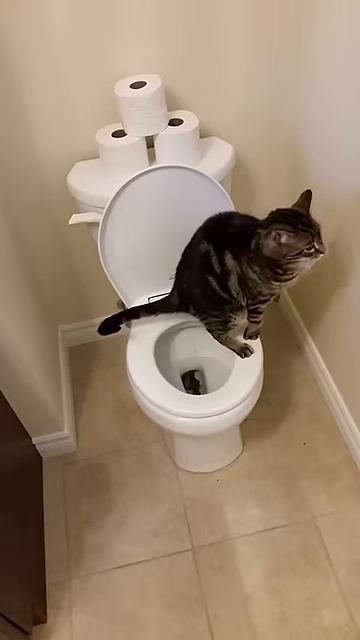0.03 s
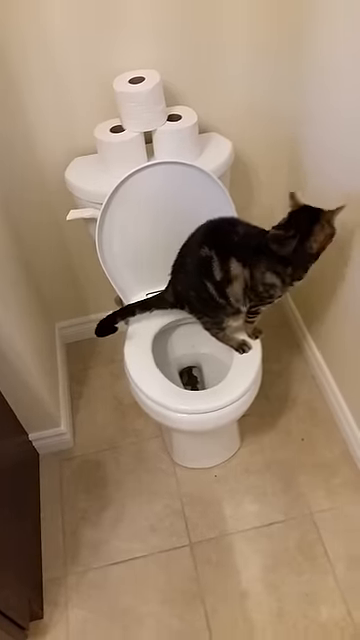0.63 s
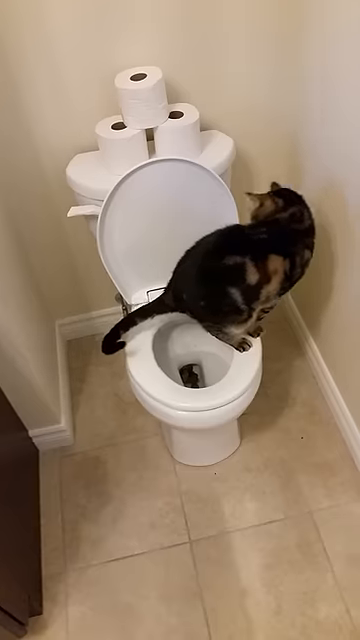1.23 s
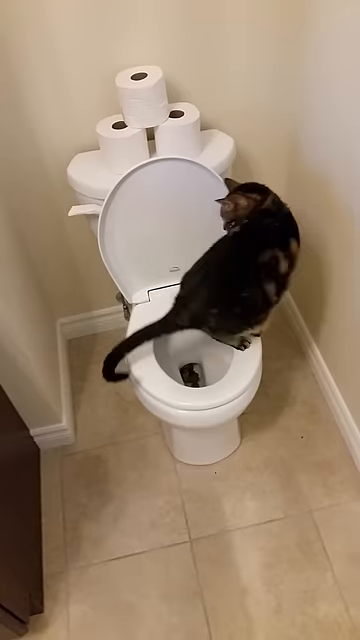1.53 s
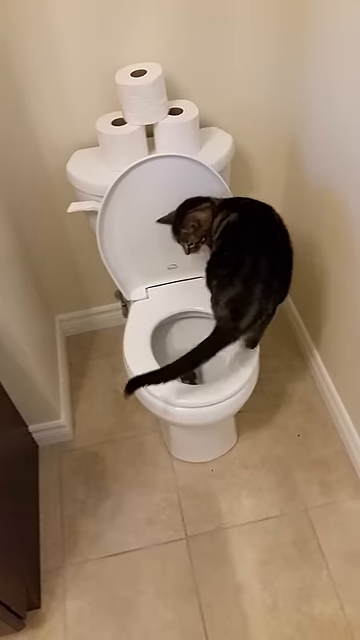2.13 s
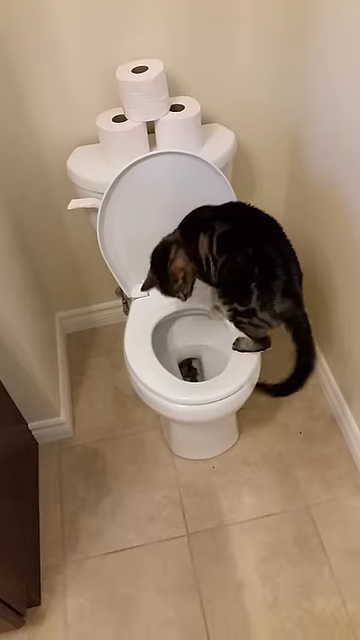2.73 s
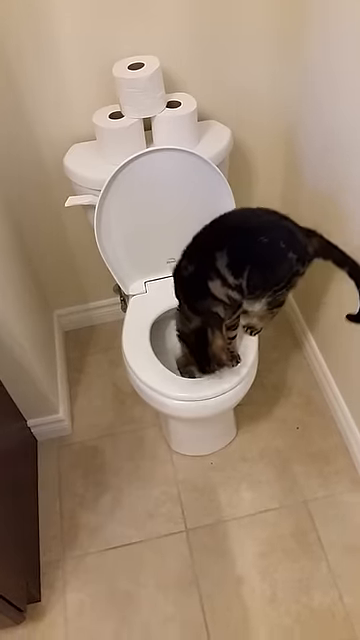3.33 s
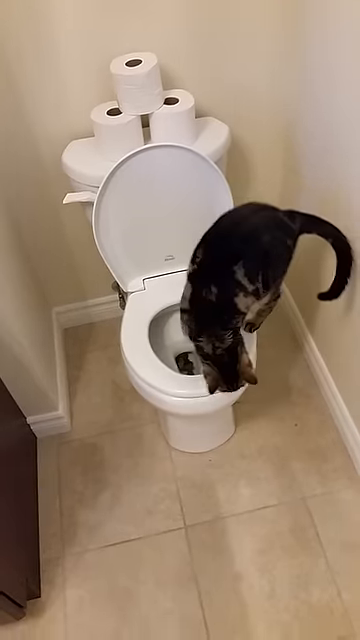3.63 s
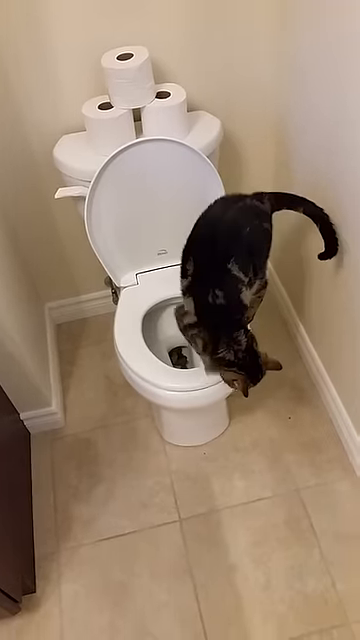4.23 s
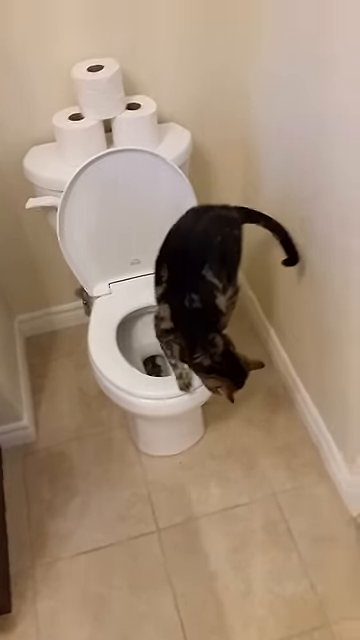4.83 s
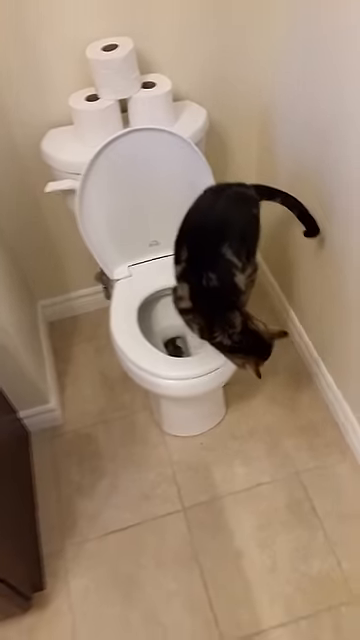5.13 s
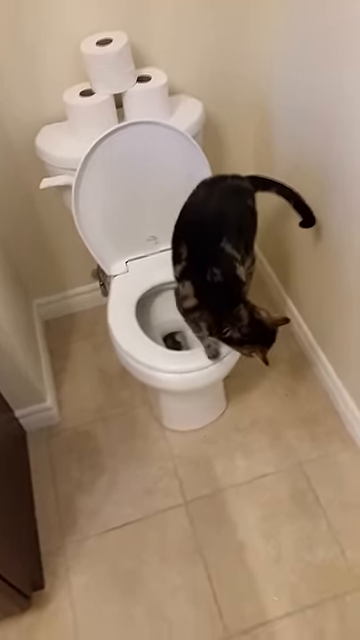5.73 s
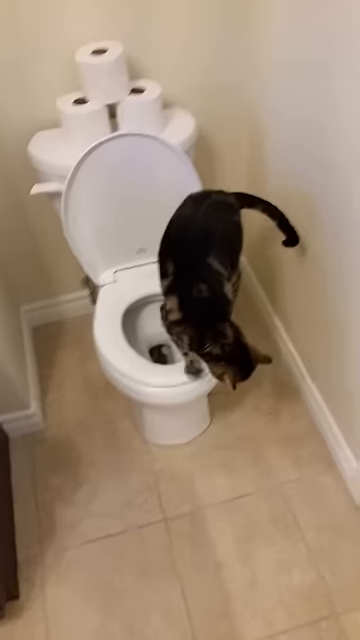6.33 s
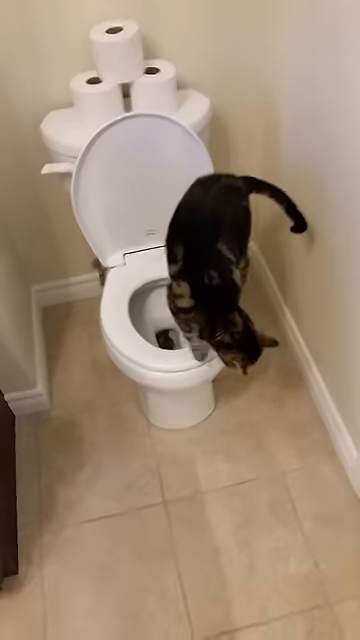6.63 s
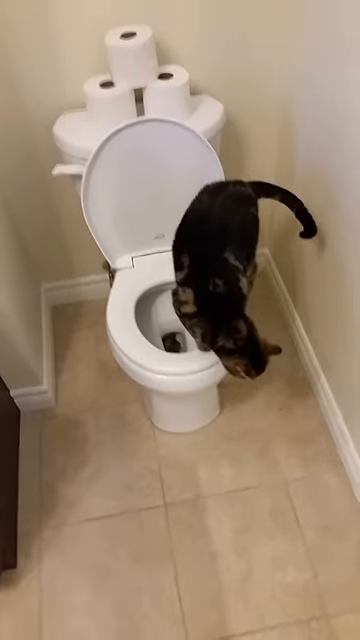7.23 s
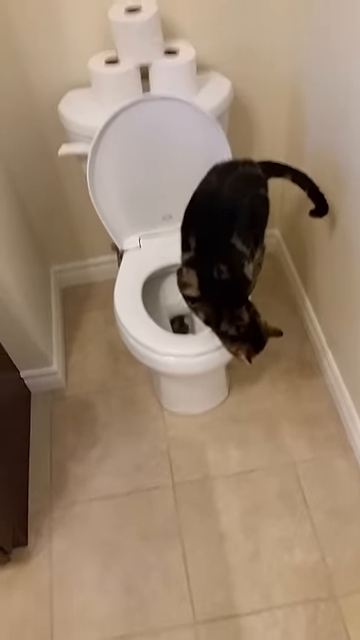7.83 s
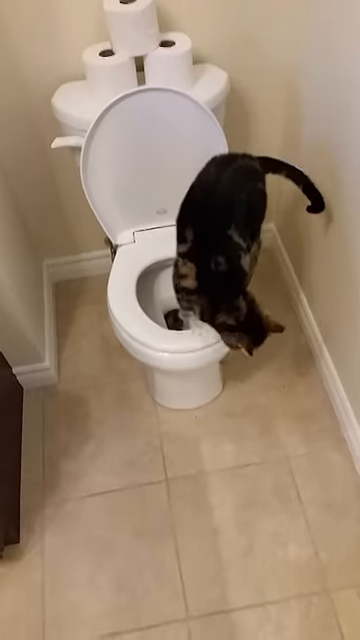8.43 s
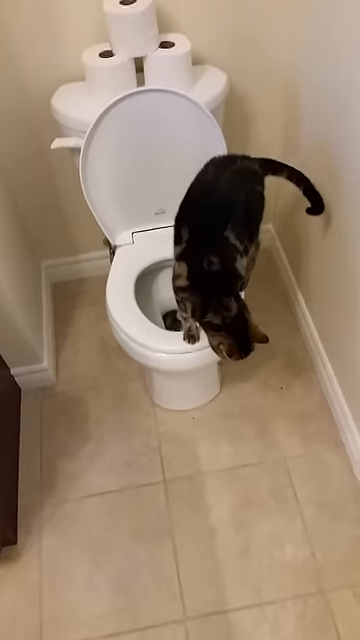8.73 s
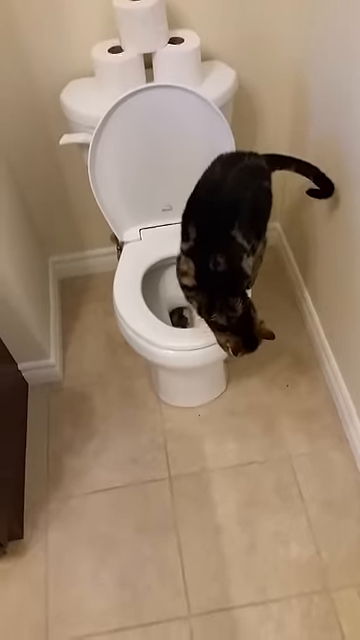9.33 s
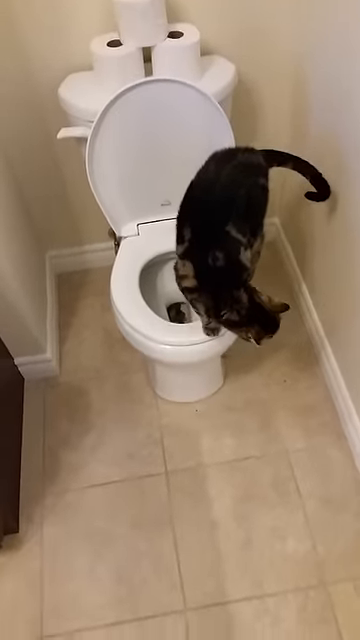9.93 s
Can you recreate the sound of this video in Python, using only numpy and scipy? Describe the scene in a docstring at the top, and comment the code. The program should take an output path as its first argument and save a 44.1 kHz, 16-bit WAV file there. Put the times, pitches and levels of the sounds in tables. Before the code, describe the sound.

Thin, high paw swipes on a toilet seat over low room hum, with handling rumble, knocks and one close scrape on the microphone.

```python
"""Small tiled bathroom. A cat paws at a plastic toilet seat: a few thin, very high friction swipes,
prolonged by the tiles. Midway the hand holding the phone shifts its grip: fingers rub and bump the
case, and one slides over the right microphone port and snaps off. Low room hum underneath."""
import sys
import numpy as np
from scipy import signal
from scipy.fft import rfft, irfft
from scipy.io import wavfile

SR = 44100
rng = np.random.default_rng(int(sys.argv[2]) if len(sys.argv) > 2 else 0)


def unload_audio(sound):
    """Save the sound as a 16-bit wav file, at the path given as the first command line argument."""
    columns = np.transpose(np.atleast_2d(sound))
    # keep every value between -1 and 1, then stretch to whole-number steps
    steps = np.round(np.clip(columns, -1, 1) * 32767)
    wavfile.write(sys.argv[1], SR, steps.astype(np.int16))


N = 441000
TIME = np.arange(N) / SR
LIGHT_DB, FIRM_DB = -66, -49.5  # hand effort in a light and a firm grip
# hand effort, as case rumble: (time [s], level [dB])
HAND_EFFORT = [(0, -72.5), (3.3, -70), (4.55, -71), (4.78, -61), (5.02, -47.5), (5.35, -54.5), (5.78, -51),
               (6.0, -49.5), (6.65, -43.5), (6.98, -50.5), (7.22, -60), (7.8, -55), (8.1, -58.5),
               (8.9, -64), (9.45, -67.5), (10, -65.5)]
# case rumble spectrum: (frequency [Hz], gain [dB])
RUMBLE_SPECTRUM = [(20, -6.5), (35, 0.5), (60, 4.5), (120, -4.5), (200, -6.5), (300, -16.5), (500, -33.5),
                   (1000, -68)]


def paw():
    """Pad and claws skim the seat with a thin hiss and stir its dull body; a caught claw rings."""
    # swipes, the faint long ones light drags: (time [s], level [dB], rise [s], fall [s], L-R [dB])
    swipes = [(5.04, -74, .13, .28, 1), (5.6, -86, .2, .3, 2), (5.92, -69.5, 0.06, 0.23, -4),
              (6.7, -74, .4, .35, 1), (7.39, -77, 0.026, 0.044, -5), (7.54, -67, 0.041, .039, -10),
              (7.615, -58.5, 0.063, 0.031, -9), (7.768, -36.5, 0.01, .0021, -15),
              (7.773, -45, 0.015, .02, 4), (8.24, -49.5, .025, 0.044, -2.5),
              (9.451, -85.5, 0.077, 0.029, 1.5), (9.62, -49.5, 0.0082, 0.0079, -2.5),
              (9.644, -47.5, .028, .028, -1)]
    # claw catch, then skid: (time [s], level [dB], rise [s], fall [s], L-R [dB])
    claw_strokes = [(2.238, -58, 0.0016, .004, -5), (2.26, -65.5, .012, 0.044, -7)]
    # spectra of swipe hiss, claw ring, seat body: (frequency [Hz], gain [dB])
    swipe_spectrum = [(1500, -55), (2700, -43), (5000, -40), (8000, -35), (9300, -26), (10100, -7),
                      (12000, -6), (14000, -2.5), (15500, 1), (17000, -20)]
    claw_spectrum = [(8000, -45), (10000, -22), (11200, -5), (12000, 3), (13200, -9), (15500, -12),
                     (17000, -30)]
    seat_spectrum = [(25, -8), (60, -1), (160, -1), (350, -12), (900, -18), (1600, -29), (2600, -28),
                     (4500, -50)]
    seat_decay_s = .05
    grain = slips(rate_hz=18000, spread_db=3.5, shared=.18)
    envelope = strokes(swipes)
    skim = envelope * colour(grain, swipe_spectrum)
    claw = strokes(claw_strokes) * colour(grain, claw_spectrum)
    pole = np.exp(-1 / (seat_decay_s * SR))
    body_envelope = signal.lfilter([1 - pole], [1, -pole], envelope)
    body = body_envelope * colour(slips(rate_hz=4000, spread_db=2.5, shared=.34), seat_spectrum)
    return (skim + claw) * undb(1.1 * wander(90)) + undb(-9) * body


def port_slide():
    """A finger lands on the right port, skids, sticks, speeds up evenly and lifts; faster is louder."""
    # spectra of scrape, scrape through the case, port hiss: (frequency [Hz], gain [dB])
    near_spectrum = [(150, 1), (400, 4), (700, -4), (1100, -9), (2500, -16.5), (4200, -23.5), (6000, -26),
                     (8300, -37), (11000, -42)]
    far_spectrum = [(200, -6), (500, -2.5), (850, -1), (1300, -6), (2000, -20), (3000, -35), (4500, -42),
                    (9000, -56)]
    hiss_spectrum = [(7000, -36), (9000, -20), (10500, -6.5), (12300, 0), (14000, -1.5), (15600, -2.5),
                     (17000, -17.5)]
    land_s, stick_s, restart_s, lift_s = 6.776, 6.81, 6.826, 6.956
    attack_s, release_s = .003, .004
    skid_speed, creep_speed = .08, .02  # lift-off = 1
    touch = np.exp(np.minimum(TIME - land_s, 0) / attack_s - np.maximum(TIME - lift_s, 0) / release_s)
    ramp = np.clip((TIME - restart_s) / (lift_s - restart_s), creep_speed, 1)
    speed = np.where(TIME < stick_s, skid_speed, ramp)
    grain = slips(rate_hz=15000, spread_db=2.5, shared=.067)
    near = colour(grain[1], near_spectrum)
    far = undb(-8.5) * colour(grain[0], far_spectrum)
    scrape = undb(-26 - 22 * (1 - speed) + 2.2 * wander(300)) * np.array([far, near])
    hiss = undb([[-60], [-40]]) * speed ** .8 * colour(grain, hiss_spectrum)
    judder = slips(rate_hz=620, spread_db=3.5, shared=.1)
    rumble = undb([[-51], [-33]]) * colour(judder, RUMBLE_SPECTRUM)
    return touch * (scrape + hiss + rumble)


def case_knocks():
    """Soft finger bumps and dry clicks of nail or case; skin rounds a blow more than nail."""
    # blows on the case: (time [s], left peak [dB], right peak [dB], contact [ms])
    bumps = [(1.242, -58, -48.5, 1.3), (3.6016, -50, -40, 1.85), (4.09, -49.5, -41, 2.8),
             (4.8439, -44, -29, 2.8), (4.8623, -27, -40, 0.37), (4.8684, -37, -30, 2.6),
             (4.9558, -34, -19, 0.88), (5.0254, -35, -37.5, .28), (5.035, -52, -32, 2.6),
             (6.219, -40, -26.5, 0.41), (6.4767, -39.5, -23.5, 0.85), (6.5791, -40, -23, .62),
             (6.6286, -30.5, -35, 0.5), (6.6502, -43, -24, 3.7), (6.7764, -20.5, -2.3, .27),
             (6.784, -43.5, -14, 3.4), (6.8433, -44, -19, 0.34), (6.8945, -38.5, -15.5, .8),
             (6.9103, -30.5, -22, 0.22), (6.9181, -40, -19.5, .6), (6.9564, -10, -27.5, 0.25),
             (7.7934, -55, -33.5, 0.41), (7.8959, -60, -32, 0.51), (8.1996, -61, -36.5, 0.56),
             (8.2914, -58, -32.5, 0.47)]
    clicks = [(4.8623, -67, -49, .05), (5.0254, -57, -50, .03), (5.8377, -62, -32, .025),
              (5.8435, -40.5, -50, 0.18), (6.7758, -43, -24, .045), (6.9562, -15.5, -27.5, .035),
              (8.2914, -70, -50, .05)]
    return blows(bumps, rounding_ms=.16) + blows(clicks, rounding_ms=.014)


def blows(table, rounding_ms):
    """Press and release; the port passes no steady pressure, so each pulse swings back."""
    leak_hz, leak_q = 82.5, 1.3
    rebound, rebound_lag = .23, 2.6  # share of force; contact lengths
    omega = 2 * np.pi * leak_hz
    port_highpass = signal.bilinear([1, 0, 0], [1, omega / leak_q, omega ** 2], SR)
    lead = round(.06 * SR)
    t_ms = np.arange(-lead, 4 * lead) * 1000 / SR
    out = np.zeros((2, N))
    for time_s, left_db, right_db, contact_ms in table:
        u = t_ms / contact_ms
        softness = rounding_ms / contact_ms + .1
        force = rebound * contact_force(u - rebound_lag, softness) - contact_force(u, softness)
        thump = signal.lfilter(*port_highpass, force)
        start = int(time_s * SR) - lead
        out[:, start:start + len(t_ms)] += undb([[left_db], [right_db]]) * thump / np.abs(thump).max()
    return out


def contact_force(u, softness):
    """Force peak with a rounded tip; u is time in contact lengths."""
    return np.exp(.85 * (softness - np.hypot(u, softness)))


def case_ring():
    """The case rings briefly as the finger snaps off, mainly at the left port."""
    # case modes: (onset [s], frequency [Hz], level [dB], T60 [s])
    modes = [(6.9577, 235, -31.5, 0.23), (6.9556, 120, -31, 0.044)]
    out = 0
    for onset_s, hz, db, t60_s in modes:
        t = np.clip(TIME - onset_s, 0, 1)
        out += undb(db - 60 * t / t60_s) * np.sin(2 * np.pi * hz * t)
    return out * undb([[0], [-24]])


def grip_rumble():
    """Creeping fingers shake the case; a firmer grip bears more on the right port."""
    # small grip shifts: (time [s], level [dB], rise [s], fall [s], L-R [dB])
    shifts = [(.41, -57.5, .025, .04, -8), (1.3, -68, .05, .1, -4), (2.58, -64, 0.17, 0.14, -3),
              (3.76, -63, 0.054, 0.033, -6), (4.69, -54, 0.018, 0.032, -7),
              (5.02, -46.5, 0.055, 0.049, -10), (5.16, -48, 0.028, 0.032, -12),
              (5.44, -54.5, 0.022, .03, -11), (5.89, -48, 0.031, 0.029, -12), (6.07, -52, .015, .02, -12),
              (6.3, -49, 0.09, .1, -13), (6.8, -34, .02, .08, -19), (8.95, -64, 0.18, 0.17, -5),
              (9.66, -57, 0.041, 0.055, -10)]
    hand_db = effort_db()
    lean_db = np.interp(hand_db, [LIGHT_DB, FIRM_DB], [5, 12])
    rumble = colour(slips(rate_hz=390, spread_db=2.5, shared=.1), RUMBLE_SPECTRUM)
    envelope = undb(np.array([hand_db - lean_db, hand_db]) + wander(11))
    return (envelope + strokes(shifts)) * rumble


def skin_rub():
    """Skin drags on the case: dull rustle and fine hiss, both growing with effort and with each wipe."""
    # quick finger wipes: (time [s], level [dB], rise [s], fall [s], L-R [dB])
    wipes = [(5.68, -76.5, .02, .03, -11), (5.91, -68, .025, 0.061, -16), (6.06, -74, .04, 0.033, -15),
             (6.235, -64.5, 0.036, .12, -16), (6.45, -77.5, .02, 0.22, -14), (7.05, -78.5, 0.061, .2, -2),
             (7.84, -81, .08, 0.092, -7), (8.26, -79, 0.028, .06, -10.5)]
    # spectra of rustle and hiss: (frequency [Hz], gain [dB])
    rustle_spectrum = [(120, -6.5), (250, 0.5), (400, -0.5), (700, -5.5), (1100, -11.5), (1600, -21.5),
                       (2600, -23.5), (4000, -41), (8000, -56)]
    hiss_spectrum = [(800, -13), (1600, 1), (2600, -2.5), (4400, 0), (6500, -7.5), (8000, -20),
                     (9200, -19.5), (10700, -1), (13000, -12), (15600, -17)]
    hand_db, wipe_gain = effort_db(), strokes(wipes)
    over_firm_db = hand_db - FIRM_DB
    pan_db = np.interp(hand_db, [LIGHT_DB, FIRM_DB], [4, 1.5])
    sides = undb([pan_db / 2, -pan_db / 2])
    rustle_gain = undb(-62.5 + .91 * over_firm_db) + undb(7) * wipe_gain.mean(axis=0)
    hiss_gain = undb(-83 + 1.15 * over_firm_db) * pan(-6.5) + wipe_gain
    rustle = colour(slips(rate_hz=2500, spread_db=4, shared=.15), rustle_spectrum)
    hiss = colour(slips(rate_hz=7000, spread_db=1.5, shared=.05), hiss_spectrum)
    return undb(1.9 * wander(75)) * (rustle_gain * sides * rustle + hiss_gain * hiss)


def skin_scuffs():
    """Quick fingertip drags, one broad resonance each; the shortest are dry cracks."""
    # scuffs: (time [s], level [dB], half length [s], resonance [Hz], L-R [dB])
    drags = [(1.79, -70, .05, 300, -3), (3.435, -69.5, 0.013, 650, -1), (3.48, -68.5, .06, 520, -4),
             (5.475, -64.5, .0057, 990, 3), (5.685, -58.5, .023, 950, -3), (5.82, -62.5, .012, 950, -1),
             (5.839, -51.5, 0.00082, 4030, -22), (6.174, -57.5, 0.0091, 1100, -3.5),
             (6.233, -61, .014, 3700, -18), (6.24, -55, .014, 850, -5), (6.276, -61, .007, 4900, -20),
             (6.339, -56.5, .028, 950, -3), (6.447, -56, .012, 999, -2), (6.453, -64, .008, 2500, -9),
             (6.533, -64.5, .004, 2994, -9), (7.767, -66, .005, 7300, -24)]
    grain = slips(rate_hz=41000, spread_db=1.5, shared=.3)
    out = np.zeros((2, N))
    for time_s, db, half_s, hz, pan_db in drags:
        swell = .5 ** np.minimum(((TIME - time_s) / half_s) ** 2, 100)
        out += undb(db) * swell * pan(pan_db) * resonate(grain, hz, width_hz=.43 * hz)
    return out


def drone():
    """A narrow, wavering low tone swells twice."""
    # swells: (time [s], level [dB], rise [s], fall [s], L-R [dB])
    swells = [(6.58, -43.5, 0.036, .13, -3.5), (7.68, -56, 0.032, 0.38, -3.5)]
    noise = ports(rng.standard_normal((3, N)), shared=1)
    return strokes(swells) * resonate(noise, hz=124, width_hz=24)


def room_hum():
    """Steady low air noise of the house, more alike at both ports in the bass."""
    # hum spectrum: (frequency [Hz], gain [dB])
    spectrum = [(15, -31.5), (25, -3), (43, -6), (188, -9.5), (289, -18.5), (871, -27.5), (1660, -43),
                (2170, -41.5), (3930, -47.5), (12800, -47.5), (15500, -47)]
    noise = rng.standard_normal((3, N))
    shared_bass = signal.sosfilt(signal.butter(2, 400, fs=SR, output="sos"), noise[2])
    return undb(-67 + .5 * wander(12)) * colour(noise[:2] + 1.1 * shared_bass, spectrum)


def tile_reverb(x, early_t60_s, late_t60_s, late_db):
    """Tile reflections: a quick dense decay plus a weak long one, each side fed by the other."""
    t = TIME[:SR]
    decay = undb(-60 * t / early_t60_s) + undb(late_db - 60 * t / late_t60_s)
    response = rng.standard_normal((2, SR)) * decay * (t > .004)
    response /= np.sqrt(np.sum(response ** 2, axis=1, keepdims=True))
    return signal.fftconvolve(x[::-1], response, axes=1)[:, :N]


def slips(rate_hz, spread_db, shared):
    """Friction: random stick-slip clicks of uneven size at both ports."""
    size = undb(spread_db * np.minimum(rng.exponential(size=(3, N)), 4))
    sign = rng.choice([-1, 1], (3, N))
    slipping = rng.random((3, N)) < rate_hz / SR
    return ports(size * sign * slipping, shared)


def ports(x, shared):
    """Stereo from three independent signals; the third supplies the shared fraction of power."""
    return np.sqrt(1 - shared) * x[:2] + np.sqrt(shared) * x[2]


def strokes(table):
    """Stereo envelope of strokes that swell and die away."""
    out = 0
    for time_s, db, rise_s, fall_s, pan_db in table:
        t = TIME - time_s
        exponent = np.where(t < 0, np.abs(t / rise_s) ** 1.22, t / fall_s)
        out += undb(db) * pan(pan_db) * np.exp(-exponent)
    return out


def effort_db():
    """Hand effort per sample."""
    return np.interp(TIME, *np.transpose(HAND_EFFORT))


def wander(rate_hz):
    """Random drift, spread near 1."""
    return np.interp(TIME * rate_hz, np.arange(4000), rng.standard_normal(4000))


def colour(x, spectrum):
    """Filter by (Hz, dB) points; rms 1."""
    hz, db = np.transpose(spectrum)
    bin_hz = np.maximum(np.arange(N // 2 + 1) * SR / N, 1)
    gain = undb(np.interp(np.log(bin_hz), np.log(hz), db))
    return unit_rms(irfft(rfft(x) * gain, N))


def resonate(x, hz, width_hz):
    """Resonator applied twice for steep skirts; rms 1."""
    b, a = signal.iirpeak(hz, hz / width_hz, SR)
    return unit_rms(signal.lfilter(b, a, signal.lfilter(b, a, x)))


def pan(db):
    """Constant-power gains for an L-R difference."""
    return unit_rms(undb([[db / 2], [-db / 2]]))


def unit_rms(x):
    return x / np.sqrt(np.mean(x ** 2))


def undb(db):
    return 10 ** (np.asarray(db) / 20)


def scene():
    """Cat and skin noise excite the room; slide and knocks are mostly direct."""
    cat = paw()
    skin = skin_rub() + skin_scuffs()
    slide = port_slide()
    knocks = case_knocks() + case_ring()
    airborne = undb(-10) * (cat + skin)
    airborne += undb(-16.5) * slide.mean(axis=0) + undb(-29.5) * knocks.mean(axis=0)
    room = tile_reverb(airborne, early_t60_s=.24, late_t60_s=1.1, late_db=-20)
    handling = undb(-1.5) * skin + slide + knocks + grip_rumble()
    return undb(-3.5) * cat + handling + drone() + room + room_hum()


def record(dry):
    """The phone's steep low-pass."""
    cutoff_hz = 15750
    return signal.sosfilt(signal.ellip(10, .2, 70, cutoff_hz, fs=SR, output="sos"), dry)


dry = scene()
out = record(dry)
unload_audio(out)
```